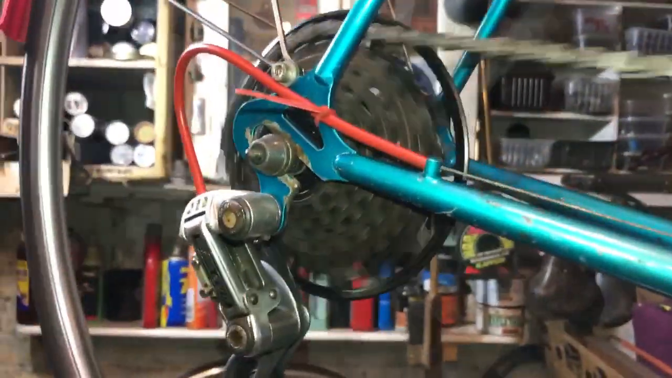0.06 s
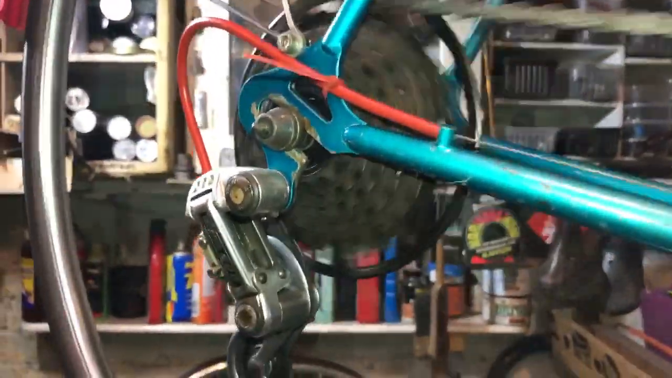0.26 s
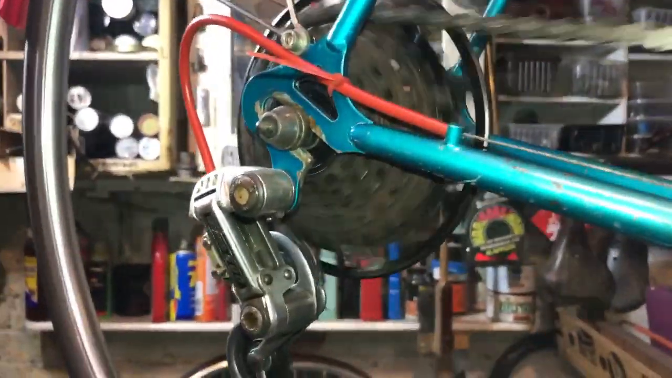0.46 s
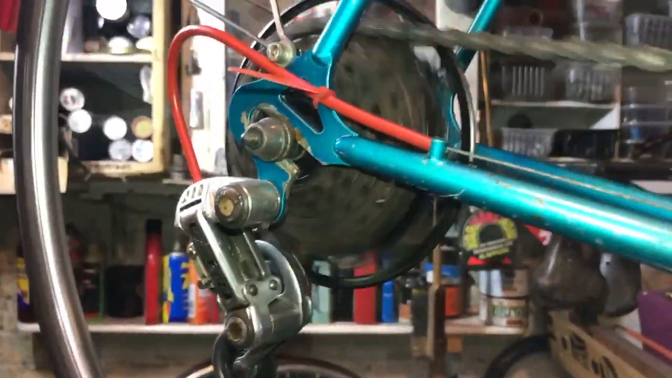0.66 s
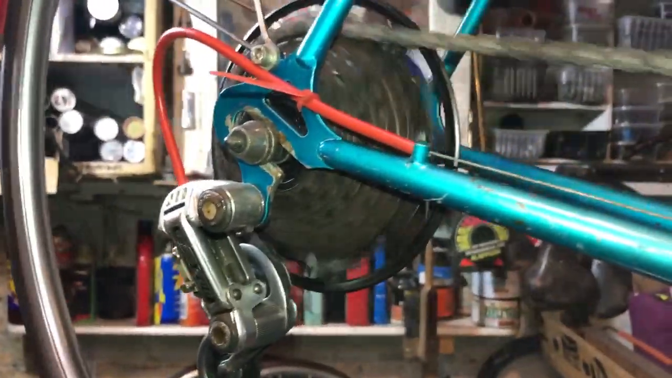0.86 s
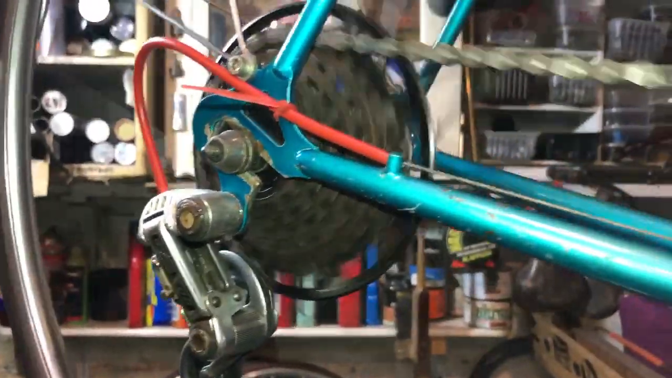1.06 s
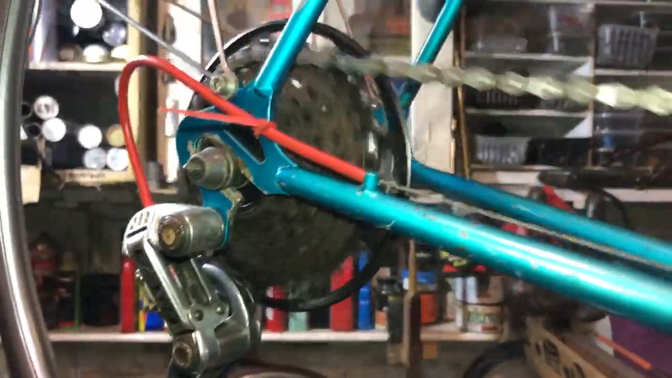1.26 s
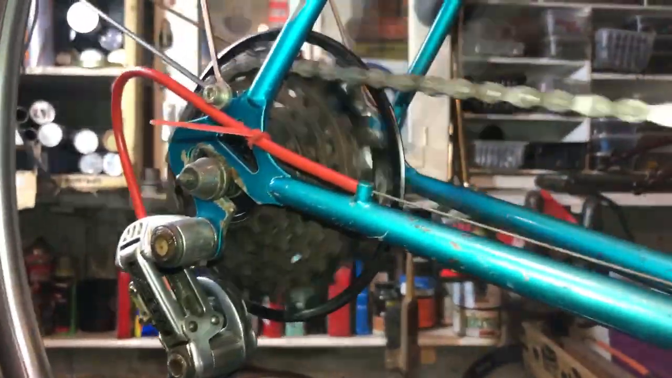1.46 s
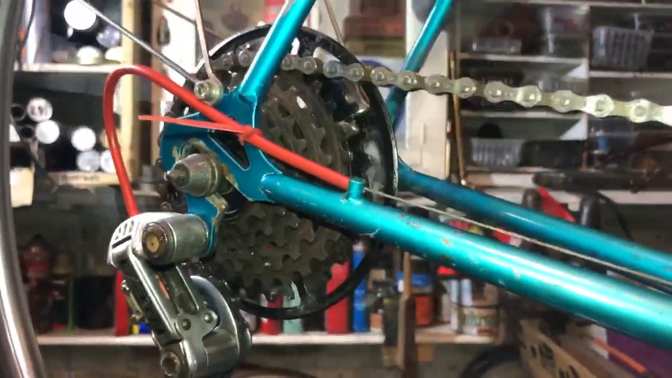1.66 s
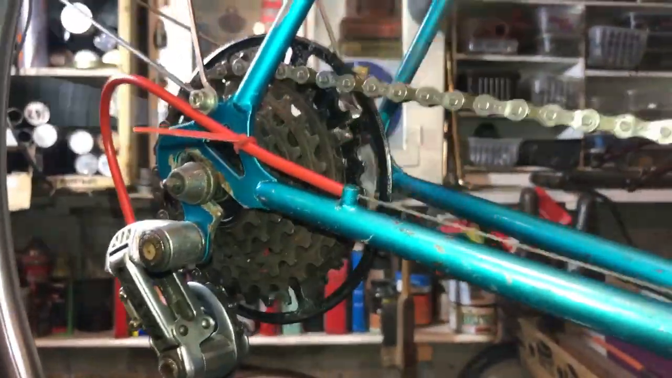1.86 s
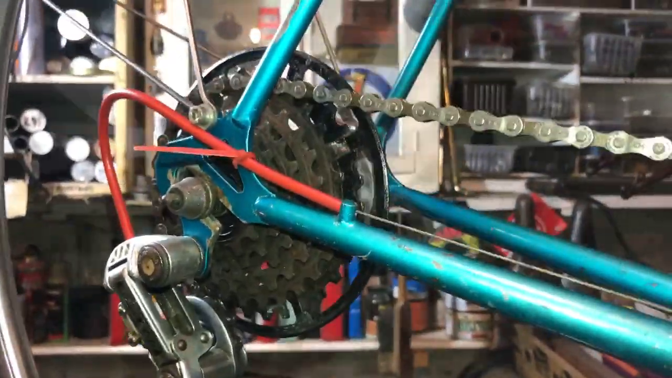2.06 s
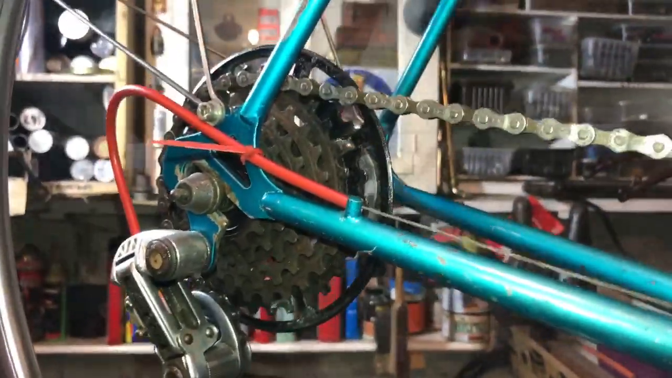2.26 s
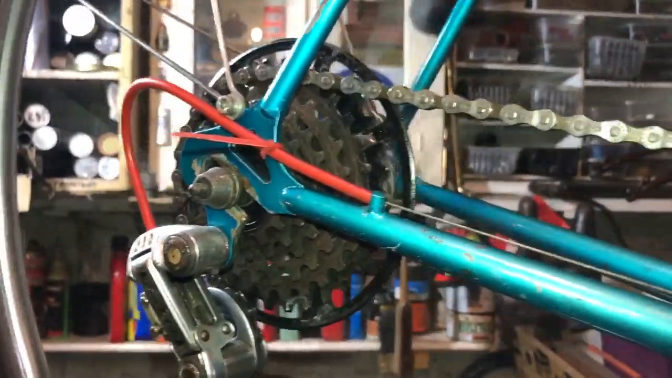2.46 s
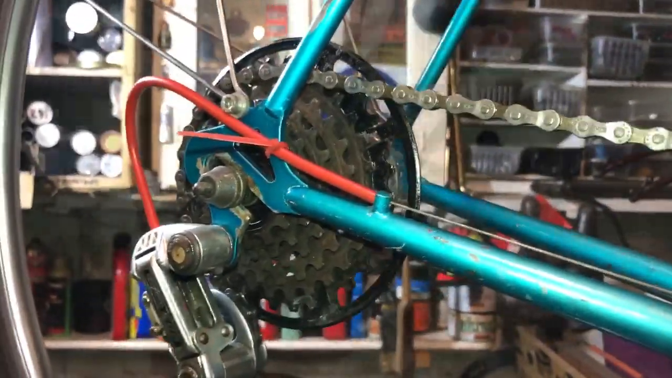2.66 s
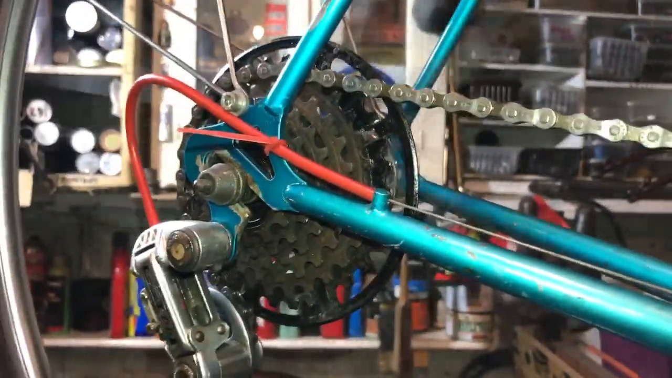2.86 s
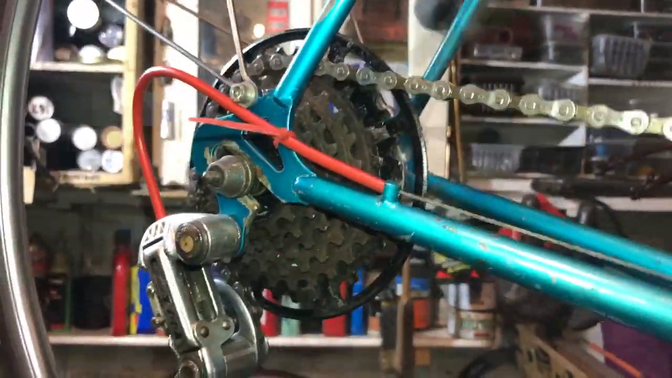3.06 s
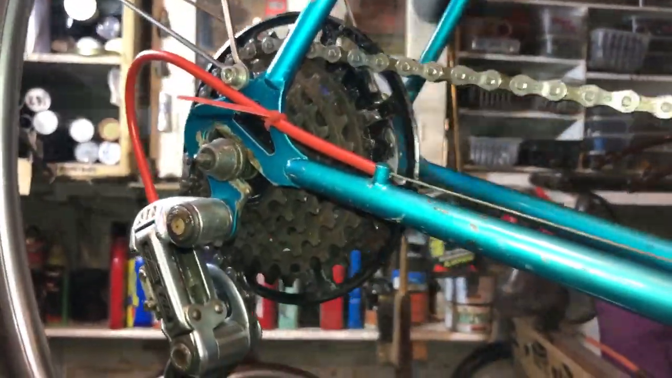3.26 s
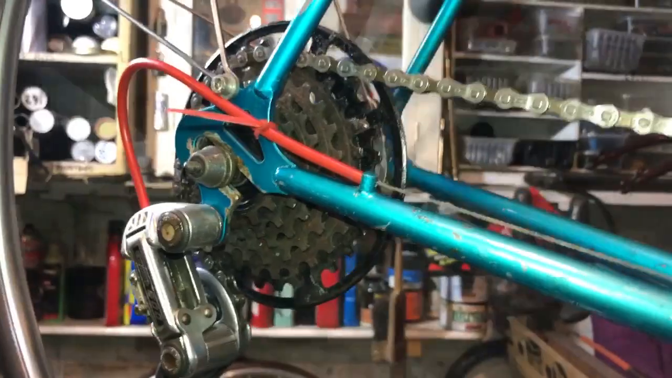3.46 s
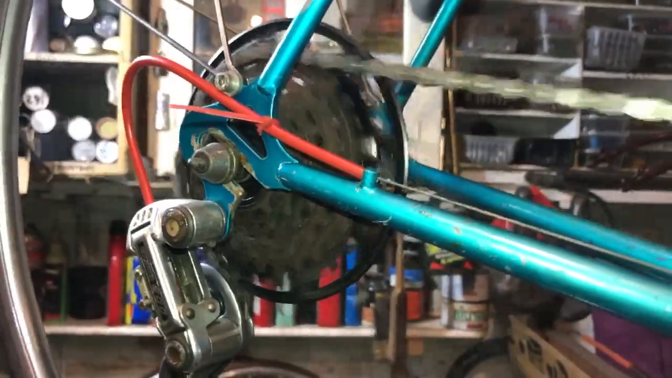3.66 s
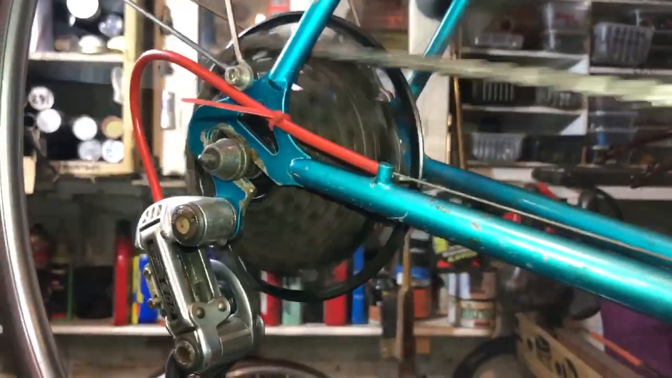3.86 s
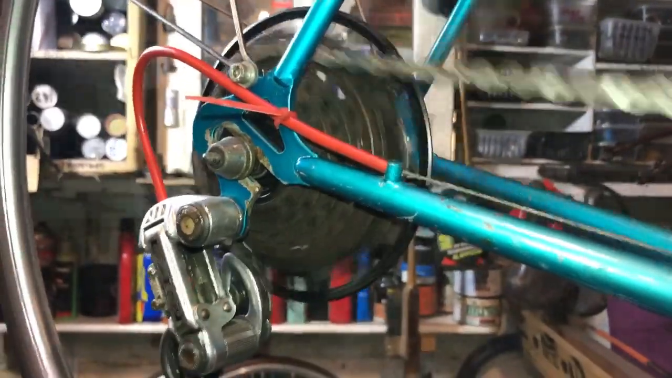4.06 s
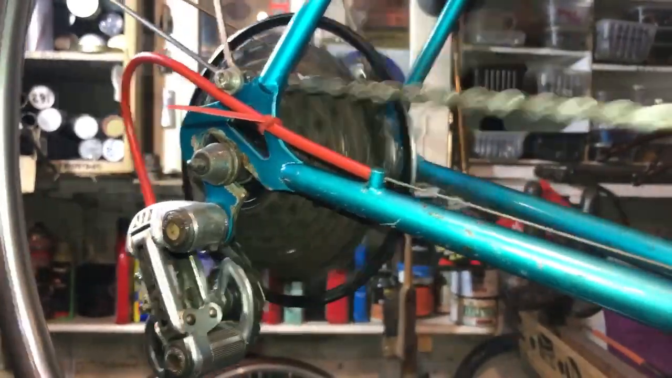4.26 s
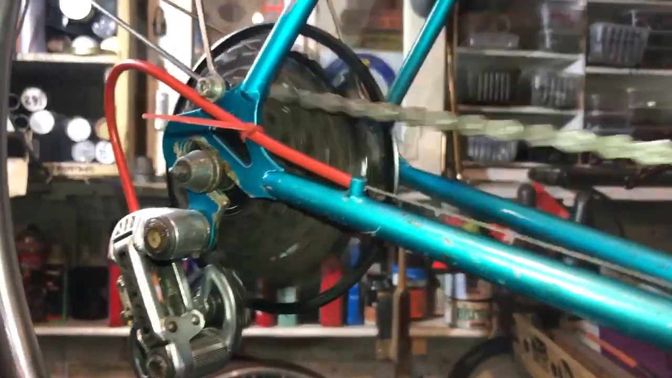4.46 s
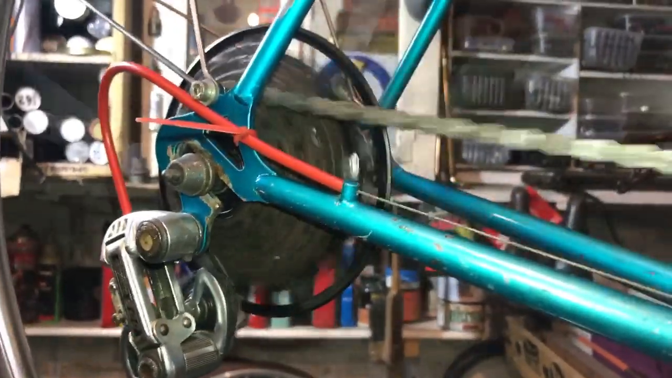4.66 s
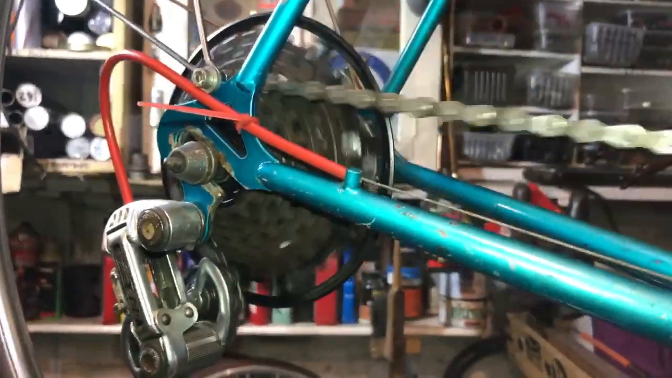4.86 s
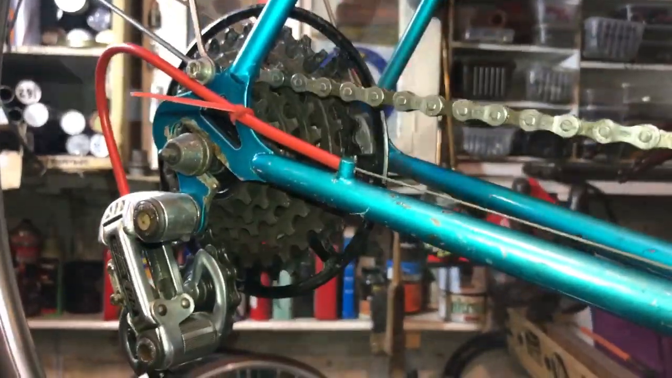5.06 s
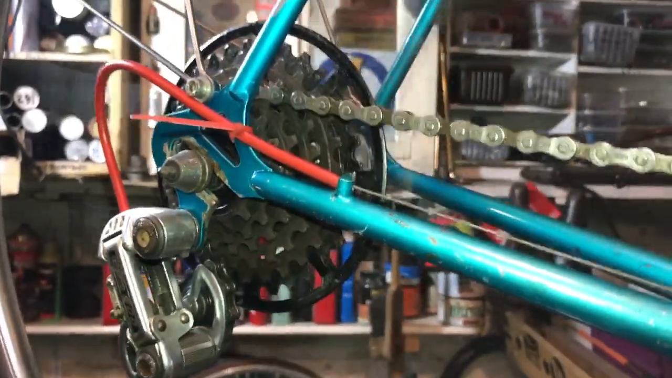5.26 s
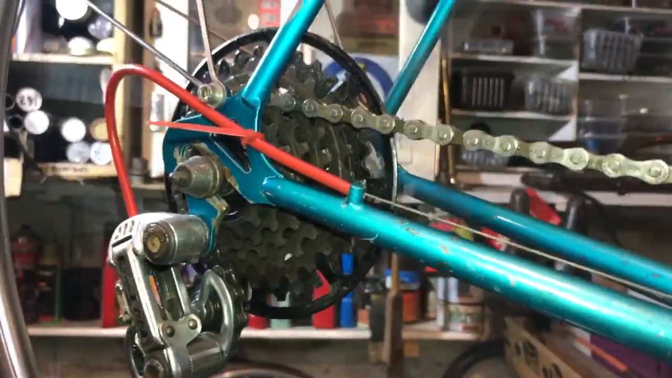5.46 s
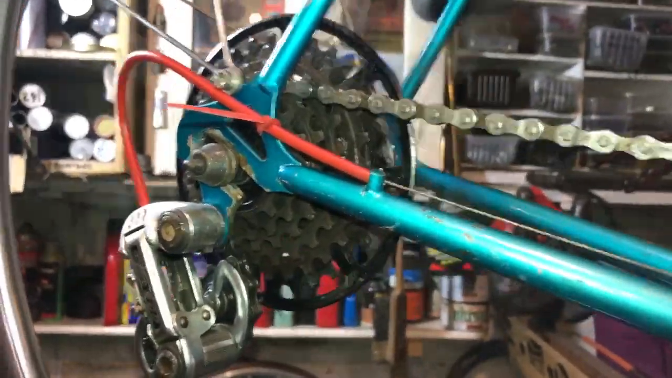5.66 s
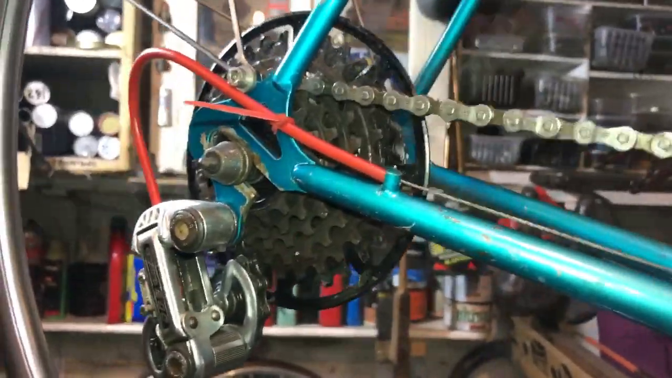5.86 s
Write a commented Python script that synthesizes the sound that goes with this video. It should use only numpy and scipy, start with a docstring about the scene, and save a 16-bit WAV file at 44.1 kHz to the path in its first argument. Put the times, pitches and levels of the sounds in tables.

```python
"""Bicycle on a repair stand

A small workshop, heard from beside the rear hub. While the cranks turn, the chain rattles through the
derailleur, scrapes and clacks from cog to cog and jolts the frame. When they rest, the wheel spins on
and the two pawls of the freewheel snap over the ratchet teeth. Bearing rumble and room air lie below."""
import sys
import numpy as np
from scipy import signal
from scipy.fft import rfft, irfft
from scipy.io import wavfile
from scipy.ndimage import uniform_filter1d

SR = 44100
rng = np.random.default_rng(int(sys.argv[2]) if len(sys.argv) > 2 else 0)


def wav_record(signal):
    """Record a signal, one row per channel, as 16-bit PCM in the file named by sys.argv[1]."""
    frames = np.transpose(np.atleast_2d(signal))
    bounded = np.clip(frames, -1, 1)
    # unit amplitude maps onto the largest positive 16-bit level
    quanta = np.round(bounded * 32767).astype(np.int16)
    wavfile.write(sys.argv[1], SR, quanta)


N = 260570
TIME = np.arange(N) / SR


def amp(db):
    return 10 ** (np.asarray(db) / 20)


def unit_energy(x):
    return x / np.sqrt(np.sum(x ** 2))


def decay(t, t60_s):
    return np.exp(-np.log(1000) * t / t60_s)


def add(track, start_s, sound, db):
    """Mix in a unit-energy blow with the energy of one millisecond at level db."""
    i = max(int(start_s * SR), 0)
    track[i:i + len(sound)] += (amp(db) * np.sqrt(SR / 1000) * sound)[:N - i]


def drift(rate_hz):
    """Smooth random motion with a spread near one."""
    step = int(SR / rate_hz)
    return uniform_filter1d(np.repeat(rng.standard_normal(N // step + 1), step), step)[:N]


def colour(x, spectrum, size=2048):
    """Minimum-phase filter of unit energy, shaped by (Hz, dB) points."""
    hz, db = np.transpose(spectrum)
    gain_db = np.interp(np.log(np.fft.rfftfreq(size, 1 / SR) + 1), np.log(hz), db)
    cepstrum = irfft(np.log(amp(gain_db)))[:size // 2]
    response = irfft(np.exp(rfft(np.r_[cepstrum[0], 2 * cepstrum[1:]], size)))
    return signal.fftconvolve(x, unit_energy(response))[:len(x)]


def ring(modes, scatter_db=0, detune=0, size=20000):
    """Struck modes; with scatter, each blow lands elsewhere and shares its energy differently."""
    hz, t60_s, db = np.transpose(modes)[:, :, None]
    t = np.arange(size) / SR
    share, shift, phase = rng.standard_normal((3, len(hz), 1))
    waves = np.sin(2 * np.pi * (hz * (1 + detune * shift) * t + phase))
    envelopes = amp(db + scatter_db * share) / np.sqrt(t60_s) * decay(t, t60_s)
    return unit_energy(np.sum(envelopes * waves, axis=0))


def resonate(force, modes):
    """A continuous force drives the modes of a part."""
    return signal.fftconvolve(force, ring(modes))[:N]


def crack(t60_s, size=6000):
    """The dense, quickly dying modes of a contact."""
    return unit_energy(rng.standard_normal(size) * decay(np.arange(size) / SR, t60_s))


def click(hz, t60_s, q):
    """A tiny steel contact, strongest in one broad resonance."""
    peak = signal.iirpeak(min(hz, 15000), q, fs=SR)
    return unit_energy(signal.lfilter(*peak, crack(t60_s, size=900)))


# Lone ticks while the cranks almost keep up with the wheel.
# Each row: start in seconds, level in dB, lag of the second pawl in seconds.
SLOW_TICKS = [(1.1193, -21, 0.0035), (1.2579, -20, 0.0086), (1.3777, -21, 0.0096), (1.4899, -18, 0.0093),
              (3.5719, -17.5, 0.01)]
# Free coasting. Each row: start, end and first tooth gap in seconds, number of the first tooth.
COASTS = [(1.5713, 2.81, .04823, 0), (2.8982, 3.52, .04997, 7), (4.8635, 5.9, .04194, 0)]
SECOND_REST_S = 4.5  # from here the freewheel rests at another angle and rings differently


def ratchet(tick_db=-18.5, swell_db=1.74, teeth=20, swell_teeth=5, loudest_tooth=3.8, slowing=.00085):
    """Teeth of an out-of-round ratchet pass ever more slowly. Gives (start s, dB, lag s, swell)."""
    ticks = [(start_s, db, lag_s, 0) for start_s, db, lag_s in SLOW_TICKS]
    for at_s, end_s, gap_s, tooth in COASTS:
        while at_s < end_s:
            swell = np.cos(2 * np.pi * (tooth - loudest_tooth) / swell_teeth)
            depth_db = swell_db if at_s < SECOND_REST_S else 0
            wobble = np.cos(np.pi * tooth / teeth) ** 6  # peaks once a turn
            lag_s = gap_s * (.034 + .076 * wobble)
            ticks.append((at_s, tick_db + depth_db * swell, lag_s, swell))
            at_s += gap_s
            gap_s *= 1 + slowing
            tooth += 1
    return ticks


# Freewheel body. Each row: mode in Hz, T60 in seconds, level in dB at the first rest and at the second.
FREEWHEEL_MODES = [(1000, .05, -27, -27), (1890, .035, -21, -20), (2200, .02, -21, -19),
                   (2600, .02, -24, -25), (3200, .02, -26, -27), (4560, .018, -22, -22),
                   (4850, .013, -15, -14), (6250, .015, -14, -16), (6720, .016, -7, -9),
                   (7650, .012, -13, -23), (8000, .022, -11, -4), (8400, .012, -13, -12),
                   (9180, .016, -11, 1), (9590, .02, -11, -12), (10050, .024, -11, -10),
                   (11620, .012, -6, -10), (12220, .014, -14, -9), (12630, .035, -7, 0),
                   (13130, .018, -8, -4), (14280, .011, -2, 0), (14680, .011, 2, 0), (15160, .017, -1, -1),
                   (15500, .014, -9, -7)]
# Snap of a pawl. Each row: frequency in Hz, gain in dB.
PAWL_SPECTRUM = [(300, -17), (1000, -34), (2200, -6), (3700, -69), (5000, -2), (7000, 2.5), (9800, 12.5),
                 (10600, -22), (11700, 13), (13000, -17), (13650, 11), (14600, 21), (15400, 20),
                 (16000, 0.5)]


def freewheel(ring_db=-7, snap_db=-10.5, slide_db=-23, bounce_db=-7, cog_db=-39, seat_db=-29):
    """Two pawls in turn slide off a tooth, snap down, bounce and chatter; a cog sings along faintly."""
    body, snaps = np.zeros((2, N))
    hz, t60_s, first_rest_db, second_rest_db = np.transpose(FREEWHEEL_MODES)
    mode_swell_db = 7 * (np.abs(hz / 6720 - 1) < .06)  # one mode swells most with the loud teeth
    snap_t60_s, slide_s = .009, .0012
    ticks = ratchet()
    for start_s, db, lag_s, swell in ticks:
        balance, rebound, force, place = rng.standard_normal(4)
        chatter = click(5000 * 1.3 ** place, t60_s=.018, q=3)
        add(body, start_s + lag_s, chatter, db + seat_db + 3 * min(force, 1.3))
        add(snaps, start_s - slide_s, crack(snap_t60_s), db + snap_db + slide_db)
        add(body, start_s, ring([(4582, .15, 0)], detune=.003), db + cog_db)
        mode_db = first_rest_db + mode_swell_db * swell if start_s < SECOND_REST_S else second_rest_db
        second_pawl_db = -4.5 + 2.5 * balance
        bounce_s = .001 * amp(2 * rebound)
        # The four blows share the energy of the tick.
        first_db = db - 10 * np.log10((1 + amp(second_pawl_db) ** 2) * (1 + amp(bounce_db) ** 2))
        for at_s, pawl_db in (start_s, first_db), (start_s + lag_s, first_db + second_pawl_db):
            for blow_s, blow_db in (at_s, pawl_db), (at_s + bounce_s, pawl_db + bounce_db):
                ping = ring(np.c_[hz, t60_s, mode_db], scatter_db=3.8, detune=.006, size=3000)
                add(body, blow_s, ping, blow_db + ring_db)
                add(snaps, blow_s, crack(snap_t60_s), blow_db + snap_db)
    return body + colour(snaps, PAWL_SPECTRUM)


# Chain landings. Each row: start in seconds, level in dB, cog size, relative ring level in dB.
CLACKS = [(0.24, -14, "large", -7), (0.2457, -4.5, "large", -5), (.2500, -15.5, "large", 2),
          (0.254, -18, "large", -2), (2.8162, -19, "middle", -17), (2.833, -21.5, "middle", -13),
          (2.8352, -19, "middle", -11), (2.8472, -28, "middle", -11), (3.8835, -15, "small", -15),
          (4.0945, -25, "small", -5), (4.0991, -15.5, "small", -7), (4.105, -21.5, "small", 1)]
# Cogs by size. Each row: mode in Hz, T60 in seconds, level in dB.
LARGE_COG_MODES = [(2290, .07, -9), (2640, .09, -12), (2995, .17, -6), (3180, .12, -13), (3525, .36, -18),
                   (3914, .1, -15), (4270, .06, -14), (4590, .085, -2), (4810, .06, -7), (5593, .1, -16),
                   (6570, .08, -7), (8085, .05, 3), (8210, .018, 6), (9310, .021, 5), (9990, .04, 4),
                   (11760, .1, -8), (13140, .24, -6), (13915, .075, 3), (14560, .045, 7)]
MIDDLE_COG_MODES = [(4587, .2, -1), (6223, .07, -8), (6778, .07, -7), (9173, .04, 0), (14460, .045, 2)]
SMALL_COG_MODES = [(2006, .06, -11), (4045, .1, -2), (4110, .05, -7), (4650, .02, -2), (5690, .16, -13),
                   (5927, .07, -10), (7445, .09, -11), (8090, .19, -7), (8530, .035, -5), (10130, .08, -7),
                   (11690, .06, -5), (12680, .06, -1), (13160, .14, -14), (15160, .06, 1)]
# Crack of a landing. Each row: frequency in Hz, gain in dB.
CLACK_SPECTRUM = [(200, -24), (700, -12.5), (1400, -20), (2200, -5.5), (3500, -15), (5000, -3),
                  (7200, -2.5), (9500, 8.5), (11000, -7), (14500, 7.5), (16000, 2)]


def gear_shifts(crack_db=-1, clatter_db=-18, clatter_t60_s=.11, settle_s=.055, loose_links=6):
    """The chain cracks onto a new cog, the cogs ring, and loose links clatter while it settles."""
    cogs, cracks = np.zeros((2, N))
    modes = {"large": LARGE_COG_MODES, "middle": MIDDLE_COG_MODES, "small": SMALL_COG_MODES}
    for start_s, db, size, ring_db in CLACKS:
        add(cracks, start_s, crack(t60_s=.012), db + crack_db)
        add(cogs, start_s, ring(modes[size], scatter_db=1, detune=.0005), db + ring_db)
        for late, place in rng.random((loose_links, 2)):
            delay_s = late * settle_s
            link = click(5500 * 2 ** (2 * place - 1), t60_s=.015, q=4)
            add(cogs, start_s + delay_s, link * decay(delay_s, clatter_t60_s), db + clatter_db)
    return cogs + colour(cracks, CLACK_SPECTRUM)


# Chain climbing a cog. Each row: start and end in seconds, base level in dB, relative plate ring in dB.
SCRAPES = [(0.162, 0.21, -39, -22), (0.225, 0.245, -19.5, -23), (1.416, 1.453, -46, -10),
           (2.805, 2.835, -29, -18), (3.87, 3.889, -13, -4.5), (3.952, 3.964, -41.5, 9.5),
           (3.97, 3.983, -47, 0), (3.998, 4.031, -44, 6.5), (4.078, 4.109, -23.5, 4),
           (4.216, 4.268, -53.5, 7), (4.598, 4.62, -37.5, -22)]
# Side plates of the chain. Each row: mode in Hz, T60 in seconds, level in dB.
PLATE_MODES = [(7910, .02, -8), (9300, .02, -3), (9910, .03, -1), (11600, .03, -1), (13100, .04, -4),
               (14400, .022, 0), (15400, .03, -5)]
# Plates grinding on a cog. Each row: frequency in Hz, gain in dB.
GRIND_SPECTRUM = [(300, -27), (1500, -11.5), (2300, -6.5), (3500, -16), (5000, -9.5), (7500, -4.5),
                  (9500, -4.5), (11000, -2), (13500, -4.5), (15300, -10.5), (16000, -35)]


def scrapes(swell_db=9, cog_db=-15):
    """Side plates stick and slip ever harder against a cog, and sing, until they ride over it."""
    pressure, plate_drive = np.zeros((2, N))
    for start_s, end_s, db, plate_db in SCRAPES:
        progress = np.clip((TIME - start_s) / (end_s - start_s), 0, 1)
        push = (TIME > start_s) * (TIME < end_s) * amp(db + swell_db * (progress - 2))
        pressure += push
        plate_drive += push * amp(plate_db)
    slips = rng.standard_normal(N) * amp(7 * drift(700))
    friction = pressure * slips
    plates = resonate(plate_drive * slips, PLATE_MODES)
    cogs = amp(cog_db) * resonate(friction, LARGE_COG_MODES + SMALL_COG_MODES)
    return colour(friction, GRIND_SPECTRUM) + plates + cogs


# Running chain, one list per run. Each row: time in seconds, roller level in dB, cage level in dB.
CHAIN_RUNS = [
    [(0.0, -65, -45.5), (0.1, -44, -77), (0.312, -47, -50), (0.508, -50, -52.5), (0.798, -47, -50),
     (1.0, -50, -48.5), (1.206, -53.5, -63.5), (1.378, -55, -56.5), (1.5, -43.5, -53)],
    [(3.55, -59, -68), (3.682, -42.5, -53), (4.008, -48, -51.5), (4.284, -50.5, -68), (4.432, -49, -63),
     (4.85, -53, -54)],
]
# Single links catching on a tooth. Each row: start in seconds, level in dB, resonance in Hz.
LINK_SNAPS = [(.098, -43, 5870), (.134, -38, 13100), (0.198, -28, 13400), (0.3206, -33, 9000),
              (0.389, -31.5, 6600), (0.4206, -34.5, 6100), (0.4588, -35.5, 14600), (.5259, -47, 13100),
              (0.56, -32, 14600), (0.636, -38, 13200), (0.6428, -32, 13600), (0.6948, -25.5, 14300),
              (0.7345, -30.5, 6130), (0.768, -45, 9300), (0.798, -34.5, 10030), (.8706, -46, 13000),
              (0.935, -36, 2700), (1.02, -42, 6600), (1.168, -41.5, 2960), (1.444, -43, 12300),
              (2.317, -40, 6300), (3.644, -32, 2600), (3.6924, -29, 9300), (3.769, -23.5, 13800),
              (3.777, -42, 14000), (3.844, -29, 11000), (3.8538, -29, 14700), (3.982, -34, 14000),
              (4.272, -45, 2740), (4.3375, -34.5, 9200), (4.342, -39, 6970), (4.36, -42, 2800),
              (4.449, -39, 13100), (4.5267, -43, 6230), (4.565, -46, 3350), (4.6675, -33.5, 4800),
              (4.73, -32.5, 13900), (4.77, -37.5, 11100), (4.8386, -53, 13200)]
# Plates rubbing. Each row: frequency in Hz, gain in dB.
RUB_SPECTRUM = [(300, -30), (900, 28), (2500, -24), (4000, -14), (6500, 18), (8000, 17), (9500, 23),
                (11000, 17), (14000, 26.5), (16000, 7)]


def chain(links_per_s=78, roller_db=-2, scatter_db=5, rub_db=-16, link_db=-6, cog_db=-14):
    """Rollers seat one by one and knock the derailleur cage, plates rub, and a few links snap."""
    clicks, rub_level, knocks = np.zeros((3, N))
    for run in CHAIN_RUNS:
        times_s, run_db, cage_db = np.transpose(run)
        for due_s in np.arange(times_s[0], times_s[-1], 1 / links_per_s):
            slack, force, place, play, corner = rng.standard_normal(5)
            at_s = due_s + .33 * slack / links_per_s
            seat_db = np.interp(at_s, times_s, run_db) + roller_db + scatter_db * min(force, 1.3)
            knock_db = np.interp(at_s, times_s, cage_db) + scatter_db * min(play, 1)
            add(clicks, at_s, click(4500 * 2 ** place, t60_s=.006, q=1), seat_db)
            add(knocks, at_s, click(1300 * 1.4 ** corner, t60_s=.03, q=2), knock_db)
        rub_level += np.interp(TIME, times_s, amp(run_db + rub_db), left=0, right=0)
    for start_s, db, hz in LINK_SNAPS:
        add(clicks, start_s, click(hz, t60_s=.006, q=1), db + link_db)
        add(clicks, start_s, ring([(hz, .014, 0)]), db + link_db)
    rubbing = rub_level * rng.standard_normal(N) * amp(6 * drift(300) + 4 * drift(25))
    cogs = amp(cog_db) * resonate(clicks, LARGE_COG_MODES + SMALL_COG_MODES)
    return clicks + knocks + colour(rubbing, RUB_SPECTRUM) + cogs


# Frame jolts. Each row: start in seconds, level in dB, stand sway in dB, pitch struck hardest in Hz.
JOLTS = [(0.25, -29, -50, 830), (0.279, -26, -40, 680), (1.074, -34, -43, 860), (1.099, -35, -41, 292),
         (1.186, -46, -38.5, 200), (2.325, -34, -64, 196), (2.832, -30.5, -56, 406),
         (3.691, -27.5, -45, 710), (3.694, -25, -38, 289), (3.885, -20, -39, 581), (3.898, -22, -42, 219),
         (3.94, -33, -41, 270), (4.0998, -22, -55, 955), (4.103, -25.5, -54, 520), (4.109, -24.5, -46, 215),
         (4.633, -30, -44, 780), (4.65, -28, -51, 217)]
# Ring of frame and stand, then sway of the stand. Each row: mode in Hz, T60 in seconds, level in dB.
FRAME_MODES = [(160, .1, -7), (202, .11, -4), (268, .18, -7), (325, .12, -3), (400, .07, -9),
               (474, .05, -8), (545, .035, -6), (595, .08, -2), (689, .06, -10), (855, .08, -11),
               (965, .045, -10), (1170, .05, -15), (1850, .07, -14)]
SWAY_MODES = [(57, .5, 0), (75, .14, -1)]
# Thud of a jolt. Each row: frequency in Hz, gain in dB.
THUD_SPECTRUM = [(40, -24), (100, -1), (250, 11), (600, 0.5), (1200, 1), (2300, -4), (5000, -15),
                 (12000, -25)]


def frame_jolts(thud_db=-7, ring_db=-3, focus_db=10, focus_octaves=.2):
    """Jerks of the chain shake the frame, each favouring other modes, and sway the stand under it."""
    tubes, thuds = np.zeros((2, N))
    hz, t60_s, mode_db = np.transpose(FRAME_MODES)
    for start_s, db, sway_db, struck_hz in JOLTS:
        favour_db = focus_db * np.exp(-(np.log2(hz / struck_hz) / focus_octaves) ** 2)
        modes = np.c_[hz, t60_s, mode_db + favour_db]
        add(tubes, start_s, ring(modes, scatter_db=1.5, detune=.01), db + ring_db)
        add(tubes, start_s, ring(SWAY_MODES, scatter_db=1, detune=.01), sway_db)
        add(thuds, start_s, crack(t60_s=.18), db + thud_db)
    return tubes + colour(thuds, THUD_SPECTRUM)


# Hum of the taut chain. Each row: partial in Hz, level in dB.
DRONE_PARTIALS = [(266, -50.5), (576, -57.5)]


def chain_drone(start_s=3.89, end_s=4.07, waver_db=2):
    """The taut chain hums through the frame until the next shift lets it go slack."""
    taut = np.interp(TIME, [start_s, start_s + .03, end_s - .02, end_s + .02], [0, 1, 1, 0])
    hum = np.zeros(N)
    for hz, db in DRONE_PARTIALS:
        hum += np.sin(2 * np.pi * hz * TIME + .35 * drift(40)) * amp(db + waver_db * drift(35))
    return taut * hum


def chain_shiver(clicks_per_s=16, level_db=-53, centre_hz=5200):
    """While the wheel coasts, the resting chain shivers on the cogs in small, stray clicks."""
    clicks = np.zeros(N)
    for start_s, end_s, _, _ in COASTS:
        for at_s in rng.uniform(start_s, end_s, int(clicks_per_s * (end_s - start_s))):
            force, place = rng.standard_normal(2)
            link = click(centre_hz * 1.3 ** place, t60_s=.012, q=4)
            add(clicks, at_s, link, level_db + 3 * min(force, 1.5))
    return clicks


# Rumble of wheel bearing and tyre. Each row: time in seconds, level in dB.
RUMBLE_LEVELS = [(0.0, -62), (0.18, -61.5), (1.05, -65), (1.43, -68.5), (1.62, -57.5), (1.85, -56),
                 (2.2, -61.5), (2.4, -58), (2.8, -57), (3.2, -62.5), (3.47, -56.5), (3.6, -66),
                 (3.881, -52.5), (3.99, -58.5), (4.27, -60.5), (4.63, -64.5), (4.85, -62), (5.05, -56.5),
                 (5.3, -55.5), (5.6, -61), (5.9, -59)]
# Tone of the rumble. Each row: frequency in Hz, gain in dB.
RUMBLE_SPECTRUM = [(60, -20.5), (110, -7), (150, -7), (215, 0.5), (270, -3), (328, 3.5), (385, -3),
                   (460, -2), (530, -1), (610, 2.5), (740, -16), (1000, -8.5), (1400, -12), (2000, -14),
                   (3500, -23.5)]


def wheel(rumble_db=2.5, flutter_db=3, frame_db=-7, waver_db=3):
    """Bearing balls roll unevenly and murmur through the hollow rim and frame."""
    times_s, db = np.transpose(RUMBLE_LEVELS)
    rolling = rng.standard_normal(N) * amp(np.interp(TIME, times_s, db) + flutter_db * drift(25.03))
    murmur = amp(frame_db + waver_db * drift(8)) * resonate(rolling, FRAME_MODES)
    return amp(rumble_db) * colour(rolling, RUMBLE_SPECTRUM) + murmur


def workshop(x, near_db=-11, shelves_db=-14, split_hz=3000, low_db=3, size=20000):
    """Spokes and tubes scatter the sound at once; crowded shelves add an echo whose treble dies first."""
    t = np.arange(size) / SR
    near, low, high = rng.standard_normal((3, size)) * (t > .002)
    low = signal.sosfilt(signal.butter(2, split_hz, fs=SR, output="sos"), low)
    high = signal.sosfilt(signal.butter(2, split_hz, "high", fs=SR, output="sos"), high)
    shelves = unit_energy(amp(low_db) * low * decay(t, t60_s=.33) + high * decay(t, t60_s=.17))
    spokes = unit_energy(near * decay(t, t60_s=.04))
    echo = amp(near_db) * spokes + amp(shelves_db) * shelves
    return x + signal.fftconvolve(x, echo)[:N]


# Room air. Each row: frequency in Hz, gain in dB.
AIR_SPECTRUM = [(25, -37), (45, -7.5), (60, 7), (85, -0.5), (200, 3), (500, -20.5), (1000, -41),
                (3000, -19), (8000, -17), (15000, -18)]


def room_tone(air_db=-62, hum_hz=57, hum_db=-73):
    """Still room air and a low, wavering hum."""
    hum = np.sin(2 * np.pi * hum_hz * TIME + drift(5.6)) * amp(hum_db + 1.2 * drift(13))
    return amp(air_db) * colour(rng.standard_normal(N), AIR_SPECTRUM) + hum


def scene():
    """The bicycle in the workshop, in mono."""
    bicycle = freewheel() + gear_shifts() + scrapes() + frame_jolts() + chain_drone()
    bicycle += wheel() + chain() + chain_shiver()
    return (workshop(bicycle) + room_tone())[None]


def record(dry, top_hz=15900):
    """Clip at full scale, then cut the top steeply."""
    lowpass = signal.ellip(8, .2, 70, top_hz, fs=SR, output="sos")
    return signal.sosfilt(lowpass, np.clip(dry, -1, 1))


dry = scene()
out = record(dry)
wav_record(out)
```